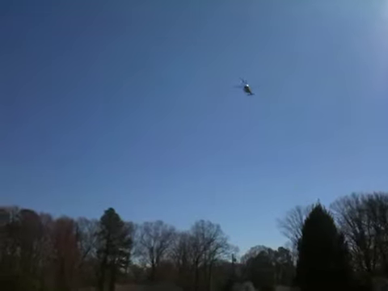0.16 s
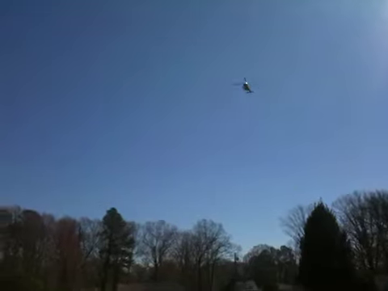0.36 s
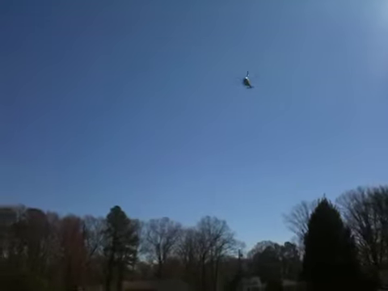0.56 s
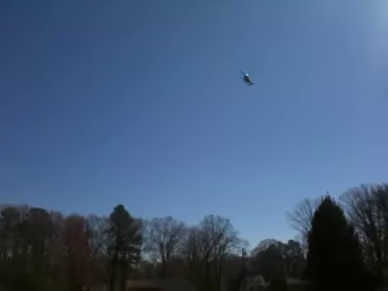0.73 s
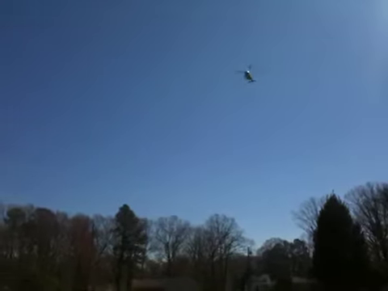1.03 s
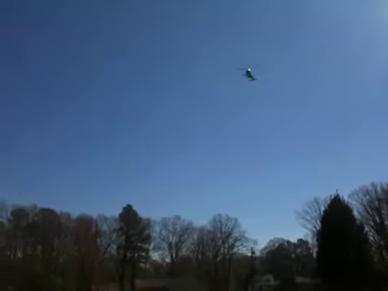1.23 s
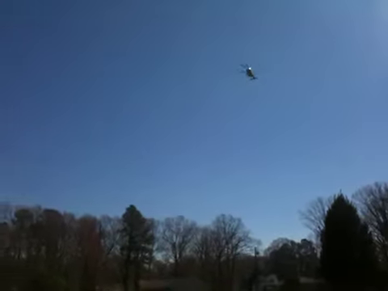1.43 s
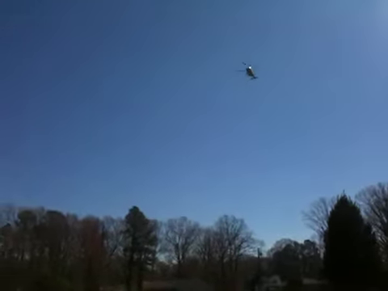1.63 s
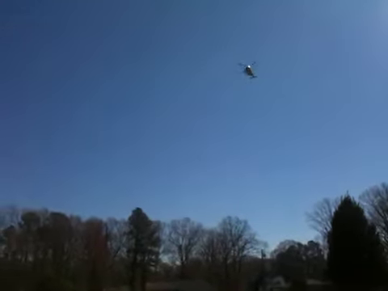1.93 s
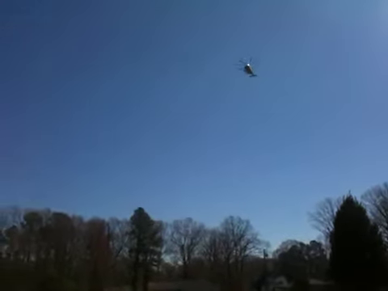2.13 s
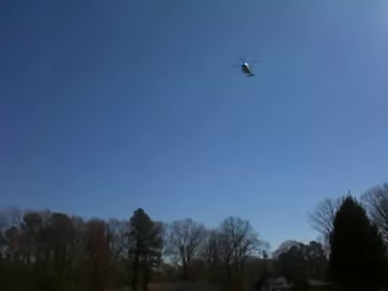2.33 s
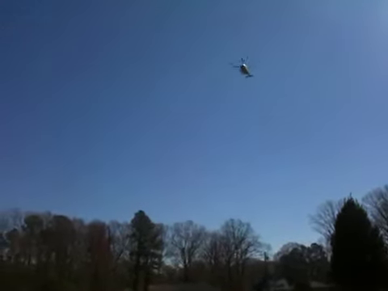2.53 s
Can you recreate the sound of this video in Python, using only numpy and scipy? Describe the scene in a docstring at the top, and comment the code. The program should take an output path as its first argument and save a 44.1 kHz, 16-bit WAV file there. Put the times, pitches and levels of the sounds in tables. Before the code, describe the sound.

Light helicopter's fast rotor slapping and rough airy wash, continuous over an open field

```python
"""Main rotor of a light helicopter hovering high over an open field ringed with trees.
Each blade slaps through the tip vortex of the one before: suction, a pressure hump and a noise rasp; some crack.
The tail rotor drones as a sum of harmonics; filtered noise makes the wash, turbine whine, rustles and rumble.
A delayed copy is the bounce off the ground; a decaying noise tail is the scatter from the trees."""
import sys
import numpy as np
from scipy import signal
from scipy.fft import rfft, irfft
from scipy.io import wavfile
from scipy.ndimage import map_coordinates

SR = 44100
rng = np.random.default_rng(int(sys.argv[2]) if len(sys.argv) > 2 else 0)


def wav_record(signal):
    """Record a signal, one row per channel, as 16-bit PCM in the file named by sys.argv[1]."""
    frames = np.transpose(np.atleast_2d(signal))
    bounded = np.clip(frames, -1, 1)
    # unit amplitude maps onto the largest positive 16-bit level
    quanta = np.round(bounded * 32767).astype(np.int16)
    wavfile.write(sys.argv[1], SR, quanta)


N = 117747
T = np.arange(N) / SR  # s


def from_db(db):
    """Decibels to amplitude gain."""
    return 10 ** (np.asarray(db) / 20)


def curve(rows, at_s):
    """Each column of a table, interpolated at the given times."""
    time_s, *columns = np.transpose(rows)
    return [np.interp(at_s, time_s, column) for column in columns]


def noise(spectrum):
    """Noise of rms 1, coloured by a spectrum that is interpolated over log frequency."""
    freq_hz, density_db = np.transpose(spectrum)
    bin_hz = np.arange(N // 2 + 1) * SR / N
    gain = from_db(np.interp(np.log(bin_hz + 1), np.log(freq_hz), density_db))
    x = irfft(rfft(rng.standard_normal(N)) * gain, N)
    return x / x.std()


def drift(points_per_s):
    """Straight lines between random points of spread 1."""
    return np.interp(T * points_per_s, np.arange(2000), rng.standard_normal(2000))


def bell(x, sigma):
    """Gaussian pulse of height 1; x and sigma share a unit."""
    return np.exp(-.5 * (x / sigma) ** 2)


def burst(ms, rise_ms, decay_ms):
    """Peak of height 1 with exponential flanks."""
    return np.exp(-np.abs(ms) / np.where(ms < 0, rise_ms, decay_ms))


# low rumble spectrum: [freq_hz, density_db (relative)]
RUMBLE_SPECTRUM = [(15, -5), (30, -6), (48, 3), (62, -5), (80, 5.5), (110, 9.5), (200, -34.5), (600, -64)]
RUMBLE_DB = -55


def rumble():
    """Faint low noise added at the microphone."""
    return from_db(RUMBLE_DB) * noise(RUMBLE_SPECTRUM)


# turbine whine spectrum: [freq_hz, density_db (relative)]
TURBINE_SPECTRUM = [(8500, -43), (9600, -14.5), (10000, 9), (10400, -20.5), (11500, -31.5)]
TURBINE_DB = -76.5


def turbine():
    """Faint whine: a narrow band of noise."""
    return from_db(TURBINE_DB) * noise(TURBINE_SPECTRUM)


# faint rustles close by: [centre_s, length_s (two sigma), level_db]
RUSTLES = [(0.785, 0.037, -67), (0.83, 0.07, -65), (2.041, 0.034, -58)]
# rustle spectrum: [freq_hz, density_db (relative)]
RUSTLE_SPECTRUM = [(2000, -24), (5000, -2), (7500, 2), (11000, -7), (15000, -16)]
RUSTLE_GRAINS_PER_S, RUSTLE_GRAIN_DB = 700, 5


def rustles():
    """Brief swells of hiss, made crackly by fast random level."""
    grains = noise(RUSTLE_SPECTRUM) * from_db(RUSTLE_GRAIN_DB * drift(RUSTLE_GRAINS_PER_S))
    swells = sum(from_db(level_db) * bell(T - centre_s, length_s / 2)
                 for centre_s, length_s, level_db in RUSTLES)
    return grains * swells


TREES_DB, TREES_T60_S = -24.5, 0.29


def trees(x):
    """Diffuse scatter from the edge of the wood: convolution with decaying noise of unit energy."""
    tail = rng.standard_normal(SR // 2) * from_db(-60 * T[:SR // 2] / TREES_T60_S)
    return from_db(TREES_DB) * signal.fftconvolve(x, tail / np.linalg.norm(tail))[:N]


# lag of the ground bounce: [time_s, lag_ms]
GROUND_LAG = [(0, 4.68), (1.2, 4.73), (1.6, 4.78), (2.67, 4.8)]
GROUND_WAVER_MS = .03


def bounce(x):
    """The sound again, late by its detour off the field."""
    lag_ms = curve(GROUND_LAG, T)[0] + GROUND_WAVER_MS * drift(25)
    return map_coordinates(x, [(T - lag_ms / 1000) * SR], order=3)


GROUND_GAIN, OVERHEAD_DULL_HZ = 1.185, 3160


def ground(x):
    """Sound from overhead meets the microphone off axis and dull; its bounce off the field follows."""
    overhead = signal.sosfilt(signal.butter(2, OVERHEAD_DULL_HZ, fs=SR, output="sos"), x)
    return overhead + GROUND_GAIN * bounce(x)


# wash spectrum: [freq_hz, density_db (relative)]
WASH_SPECTRUM = [(100, -44), (220, 3), (400, 1), (650, 1.5), (850, -8), (1100, -7.5), (1500, -11.5),
                 (2200, -15), (3000, -25.5), (3500, -23), (3750, -33.5), (4100, -28.5), (4500, -36),
                 (5300, -31.5), (7000, -39), (9000, -46.5), (10500, -45.5), (12000, -58.5), (15000, -56)]
# wash level before swell and flutter: [time_s, level_db]
WASH_LEVEL = [(0, -33), (.9, -33), (1.6, -32.5), (2.1, -33.5), (2.67, -33.5)]
WASH_SWING_DB, WASH_LAG_MS = 2, 7.4
WASH_FLUTTER_DB, WASH_FLUTTER_PER_S = 1.8, 220
WASH_BOUNCE_GAIN = 0.17


def wash(ms):
    """Turbulent air off the blades, fluttering and swelling once a pass, with its ground bounce."""
    turns = (ms - WASH_LAG_MS) / 1000 * curve(BLADE_RATE, T)[0]
    swell_db = WASH_SWING_DB * np.cos(2 * np.pi * turns)
    flutter_db = WASH_FLUTTER_DB * drift(WASH_FLUTTER_PER_S)
    hiss = noise(WASH_SPECTRUM) * from_db(curve(WASH_LEVEL, T)[0] + swell_db + flutter_db)
    return hiss + WASH_BOUNCE_GAIN * bounce(hiss)


# tail rotor blade passes: [time_s, rate_hz]
TAIL_RATE = [(0, 75.0), (.4, 75.05), (1.0, 75.25), (1.4, 75.27), (1.8, 75.1), (2.67, 75.08)]
# tail rotor harmonics: [order (multiple of the pass rate), level_db]
TAIL_ORDERS = [(1, -31.5), (2, -34), (3, -28.5), (4, -37.5), (5, -42), (6, -45.5), (8, -51.5), (9, -69),
               (12, -51.5), (14, -57)]
# added to the harmonics: [time_s, orders_1_to_3_db, higher_orders_db]
TAIL_LEVEL = [(0, 1, 5.5), (.6, -1, 1.5), (1.0, -3.5, -2), (1.5, -2.5, -0.5), (2.0, -3.5, -7),
              (2.67, -2.5, 1.5)]
TAIL_WAVER_DB, TAIL_WAVER_RAD = 1.5, .035  # radians at order 1


def tail_rotor():
    """One soft pulse for each tail blade: a drone whose harmonics waver in the moving air."""
    phase = 2 * np.pi * (np.cumsum(curve(TAIL_RATE, T)[0]) / SR + rng.random())
    low_db, high_db = curve(TAIL_LEVEL, T)
    drone = 0
    for order, order_db in TAIL_ORDERS:
        level_db = order_db + (low_db if order <= 3 else high_db)
        wave = np.cos(order * (phase + TAIL_WAVER_RAD * drift(18)))
        drone = drone + from_db(level_db + TAIL_WAVER_DB * drift(6.77)) * wave
    return np.sqrt(2) * drone  # levels are rms


# main rotor blade passes: [time_s, rate_hz]
BLADE_RATE = [(0, 26.56), (.5, 26.56), (.8, 26.63), (1.2, 26.63), (1.4, 26.57), (1.8, 26.56), (2.05, 26.46),
              (2.3, 26.53), (2.67, 26.59)]
FIRST_PASS_S = .0241


def blade_passes():
    """Times of the passes; for every sample, the nearest pass and the ms since it."""
    turns = np.cumsum(curve(BLADE_RATE, T)[0]) / SR  # one turn per blade pass
    turns -= np.interp(FIRST_PASS_S, T, turns)
    times_s = np.interp(np.arange(int(turns[-1]) + 1), turns, T)
    nearest = np.clip(np.round(turns).astype(int), 0, len(times_s) - 1)
    ms = (T - times_s[nearest]) * 1000
    return times_s, nearest, ms


AIR_CUT_HZ = 6250


def air(x):
    """Distance takes the top off the slaps."""
    return signal.sosfilt(signal.butter(3, AIR_CUT_HZ, fs=SR, output="sos"), x)


# colour of the chop at the listener: [centre_hz, gain_db, width_hz]
CHOP_COLOUR = [(253, 2, 160), (464, -12, 168), (611, 6, 208), (844, -7, 230), (1083, 7, 74),
               (1354, -2.5, 250), (2050, 3, 500), (4500, -1.5, 440)]


def colour(x):
    """Broad resonant peaks and dips, one after the other."""
    for centre_hz, gain_db, width_hz in CHOP_COLOUR:
        b, a = signal.iirpeak(centre_hz, centre_hz / width_hz, fs=SR)
        x = x + (from_db(gain_db) - 1) * signal.lfilter(b, a, x)
    return x


# lift push on every pass: [time_s, level_db]
LIFT = [(0, -32), (.4, -20.5), (.7, -22), (.95, -13.5), (1.25, -16), (1.55, -30), (1.9, -21.5),
        (2.3, -23.5), (2.67, -16)]
LIFT_LAG_MS, LIFT_SIGMA_MS = 0.76, 0.74


def lift_push(ms):
    """The lift of each blade pushes a broad pulse of air on every pass."""
    return from_db(curve(LIFT, T)[0]) * bell(ms - LIFT_LAG_MS, LIFT_SIGMA_MS)


# hardest vortex strikes: [time_s, gain_db (over the other slaps), crack_db]
CRACKS = [(.026, 3.5, -31), (.063, -1, -31), (.1, 3, -46), (.212, 3, -40), (.287, 1.5, -30), (.4, 2.5, -39),
          (.551, 3.5, -40), (.626, 6.5, -17.5), (.701, 3.5, -18.5), (.776, -1.5, -19.5), (.814, 0, -12),
          (.889, -1.5, -10), (.965, 0, -21), (1.114, 2.5, -27), (1.152, 1, -14), (1.19, 4, -13.5),
          (1.227, 2, -22), (1.34, 0, -21.5), (1.453, 1, -23), (1.528, 0.5, -23), (1.565, 1, -22.5),
          (1.603, -1.5, -19.5), (1.641, 2, -24), (1.716, 1.5, -20), (1.753, -1.5, -16.5),
          (1.866, 0.5, -11.5), (2.094, 0.5, -14), (2.131, 4, -39), (2.207, 2.5, -23), (2.245, 2.5, -16)]


def hard_strikes(times_s):
    """For every pass, its extra gain and the strength of its crack."""
    gain, shock = np.ones(len(times_s)), np.zeros(len(times_s))
    for time_s, gain_db, crack_db in CRACKS:
        k = np.argmin(np.abs(times_s - time_s))
        gain[k], shock[k] = from_db(gain_db), from_db(crack_db)
    return gain, shock


# crackle spectrum: [freq_hz, density_db (relative)]
CRACKLE_SPECTRUM = [(500, -11), (2000, -3.5), (4000, 28), (6500, -7), (9000, -11), (14000, -30.5)]
CRACKLE_DB, CRACKLE_DECAY_MS = -23, 1.0
CRACK_FLANK_MS, CRACK_BODY_DB, CRACK_BODY_SIGMA_MS = .065, -12.5, 0.096


def crack(ms):
    """On a hard strike the suction steepens into a shock with a rounded foot and trails off in crackle."""
    crackle = from_db(CRACKLE_DB) * noise(CRACKLE_SPECTRUM) * burst(ms, RASP_RISE_MS, CRACKLE_DECAY_MS)
    spike = burst(ms, CRACK_FLANK_MS, CRACK_FLANK_MS)
    body = from_db(CRACK_BODY_DB) * bell(ms, CRACK_BODY_SIGMA_MS)
    return crackle - spike - body


# torn air spectrum: [freq_hz, density_db (relative)]
RASP_SPECTRUM = [(150, -24), (400, 0.5), (650, 8), (850, 11), (1100, -11), (1500, -10), (2100, -3.5),
                 (2900, -15), (4200, -18.5), (7000, -29.5), (14000, -20)]
RASP_DB, RASP_RISE_MS, RASP_DECAY_MS = -6.5, .6, 7  # dB over the bite


def rasp(ms):
    """Torn air: a noise burst around each vortex strike."""
    return from_db(RASP_DB) * noise(RASP_SPECTRUM) * burst(ms, RASP_RISE_MS, RASP_DECAY_MS)


HUMP_DB, HUMP_LAG_MS, HUMP_SIGMA_MS = 7, 0.79, 0.36
SUCTION_DB, SUCTION_SIGMA_MS = 3.5, 1


def vortex_pulse(ms):
    """Suction as the blade nears a vortex, pressure as it leaves."""
    hump = from_db(HUMP_DB) * bell(ms - HUMP_LAG_MS, HUMP_SIGMA_MS)
    suction = from_db(SUCTION_DB) * bell(ms, SUCTION_SIGMA_MS)
    return hump - suction


# how hard the blades meet the vortex: [time_s, thump_db, bite_db (snap and rasp)]
SLAP = [(0, -25.5, -23), (.14, -28, -25.5), (.21, -16, -24), (.29, -25.5, -23.5), (.45, -32.5, -28),
        (.65, -22, -29.5), (.8, -20.5, -23), (.89, -19.5, -20), (.965, -22, -24), (1.005, -38, -26),
        (1.08, -38, -26.5), (1.12, -15, -30), (1.21, -21, -26.5), (1.3, -17, -29.5), (1.39, -22, -28.5),
        (1.49, -19.5, -26.5), (1.545, -11.5, -28), (1.62, -22, -22), (1.75, -17, -29.5),
        (1.9, -22.5, -25.5), (2.03, -27, -33.5), (2.12, -26, -32), (2.33, -23, -29), (2.45, -20, -41.5),
        (2.67, -25.5, -30.5)]
# further vortices that a blade grazes: [time_s, before_gain, after_gain (relative to the main one)]
GRAZING = [(0, 0.49, 0.84), (.12, 0.7, 0.57), (.28, 0.28, 0.19), (.45, 0.18, 0.39), (.63, 0.034, 0.18),
           (.82, 0.075, 0.4), (.92, 0.064, 0.28), (1.23, 0.13, 0.62), (1.55, 0.064, 0.18),
           (2.05, 0.41, 0.45), (2.13, 1, 0.062), (2.21, 0.32, 0.47), (2.67, 0.29, .15)]
# the vortex wanders, so the blade meets it sooner or later in its pass: [time_s, shift_ms]
VORTEX_SHIFT = [(0, .1), (.22, -.55), (.36, 0), (.55, -1.5), (.62, .2), (.8, -1.6), (.85, -1.8),
                (.885, -.4), (1.04, -.8), (1.22, -.3), (1.34, -1.3), (1.44, 0), (1.59, -.9), (1.66, -.6),
                (1.93, -1), (2.23, -.1), (2.42, -.5), (2.67, -.3)]
VORTEX_GAP_MS, GRAZE_WANDER_MS, GRAZE_SPREAD_DB = 2.194, .22, 2
SNAP_DB, SNAP_SIGMA_MS = 8.5, 0.13
THUMP_SPREAD_DB, BITE_SPREAD_DB, WIDTH_SPREAD_DB, JITTER_MS = 1.0, 1.0, 1.0, .07


def slaps(times_s, nearest, ms):
    """Every pass pushes, thumps, snaps and rasps, each a little different in strength, width and moment."""
    chance = rng.standard_normal((len(times_s), 8))[nearest].T
    pass_s = times_s[nearest]
    gain, shock = hard_strikes(times_s)
    thump_db, bite_db = curve(SLAP, pass_s)
    before_gain, after_gain = curve(GRAZING, pass_s)
    thump = gain[nearest] * from_db(thump_db + THUMP_SPREAD_DB * chance[0])
    bite = gain[nearest] * from_db(bite_db + BITE_SPREAD_DB * chance[1])
    stretch = from_db(WIDTH_SPREAD_DB * chance[7])
    out = lift_push(ms)
    strike_ms = ms - curve(VORTEX_SHIFT, pass_s)[0] + JITTER_MS * chance[2]
    before_lead_ms = VORTEX_GAP_MS + GRAZE_WANDER_MS * chance[3]
    after_lead_ms = -VORTEX_GAP_MS + GRAZE_WANDER_MS * chance[5]
    before = (before_lead_ms, before_gain * from_db(GRAZE_SPREAD_DB * chance[4]))
    after = (after_lead_ms, after_gain * from_db(GRAZE_SPREAD_DB * chance[6]))
    for lead_ms, strength in (before, (0, 1), after):
        vortex_ms = strike_ms + lead_ms
        # the steep edge of the suction snaps, in step with the rasp
        snap = from_db(SNAP_DB) * bell(vortex_ms, SNAP_SIGMA_MS)
        out = out + strength * (thump * vortex_pulse(vortex_ms / stretch) - bite * snap)
    return out + bite * rasp(strike_ms) + shock[nearest] * crack(strike_ms)


def scene():
    """Main rotor over the field, with trees, wash, tail rotor, turbine and rustles."""
    times_s, nearest, ms = blade_passes()
    chop = ground(air(colour(slaps(times_s, nearest, ms))))
    background = turbine() + rustles() + trees(chop) + wash(ms)
    return (background + tail_rotor() + chop)[None]


MIC_LOW_HZ, CUTOFF_HZ = 152.4, 15200


def record(dry):
    """A small microphone that cuts the bass and adds a faint rumble; the top is cut."""
    thin = signal.sosfilt(signal.butter(4, MIC_LOW_HZ, "high", fs=SR, output="sos"), dry)
    top_cut = signal.ellip(10, .1, 80, CUTOFF_HZ, fs=SR, output="sos")
    return signal.sosfilt(top_cut, thin + rumble())


dry = scene()
out = record(dry)
wav_record(out)
```